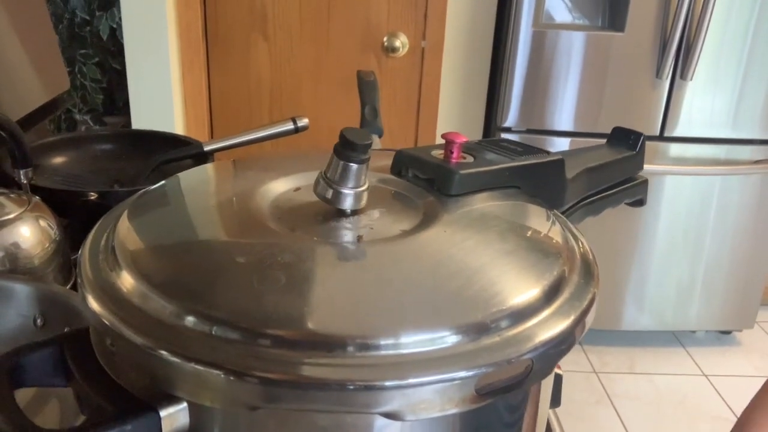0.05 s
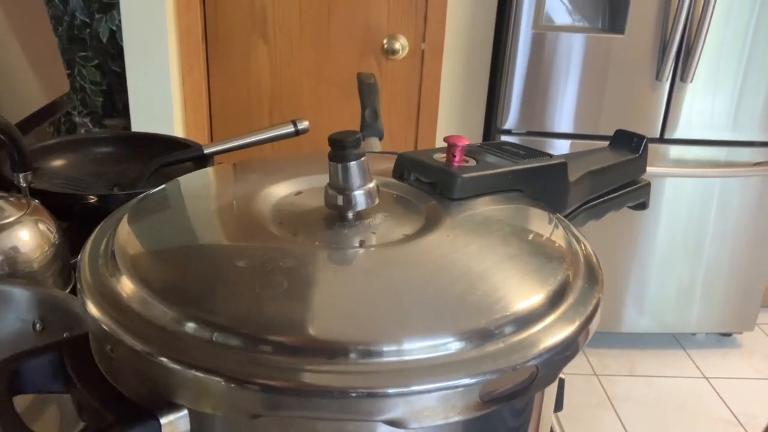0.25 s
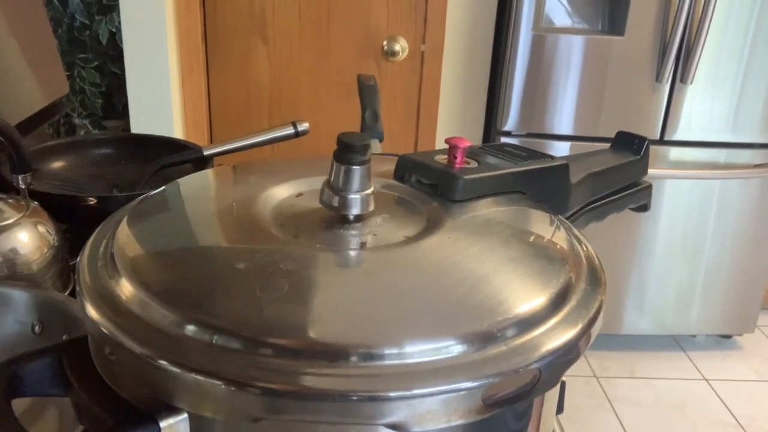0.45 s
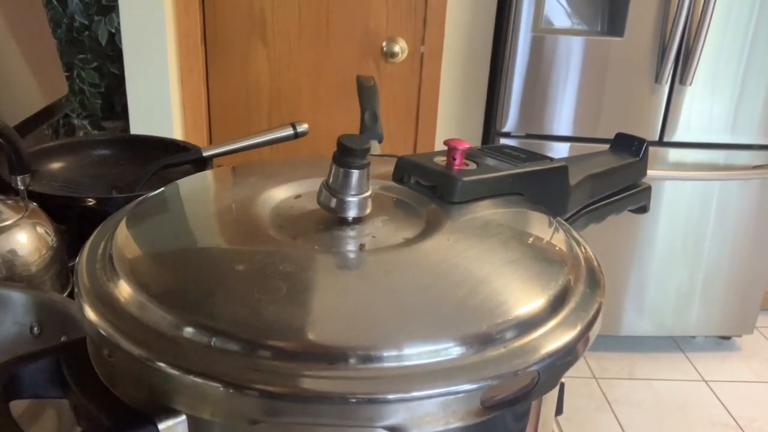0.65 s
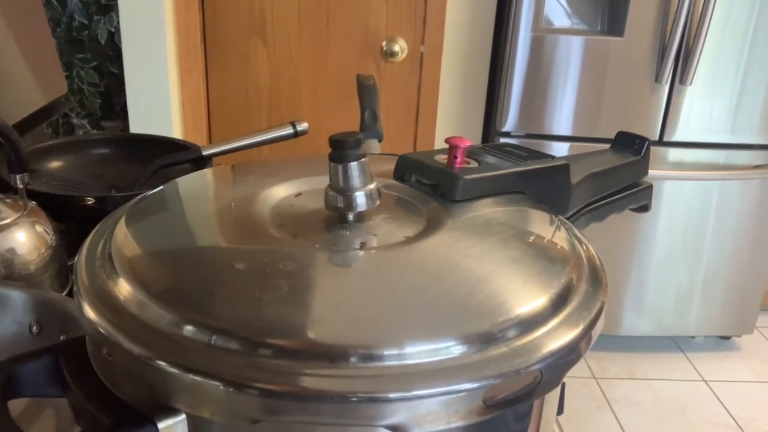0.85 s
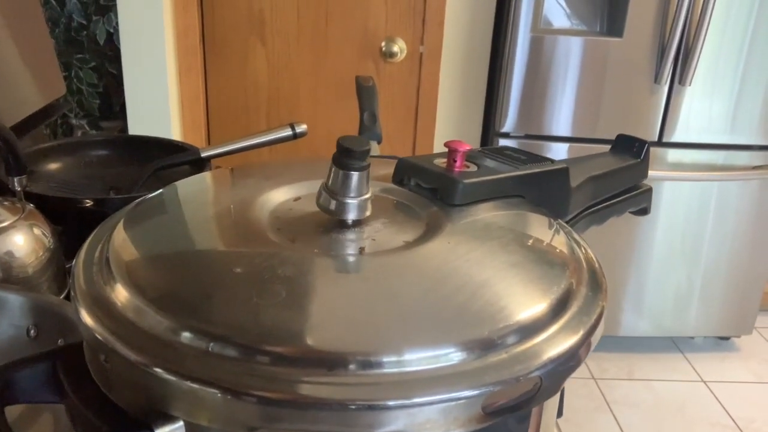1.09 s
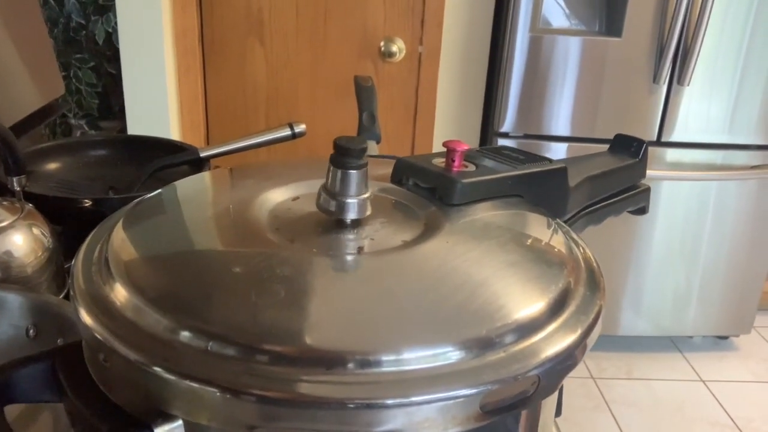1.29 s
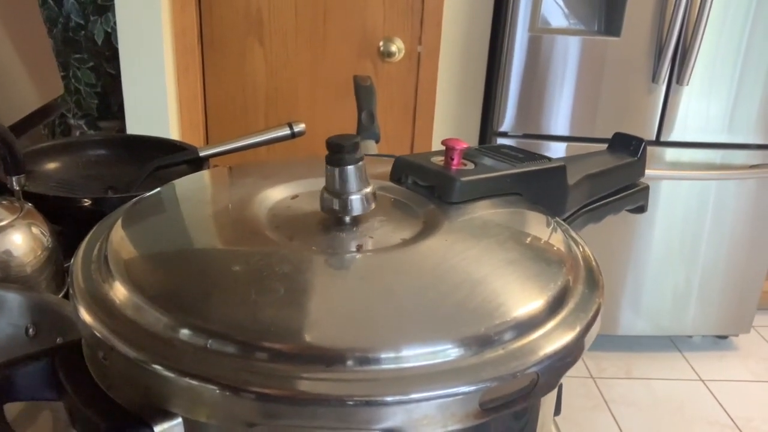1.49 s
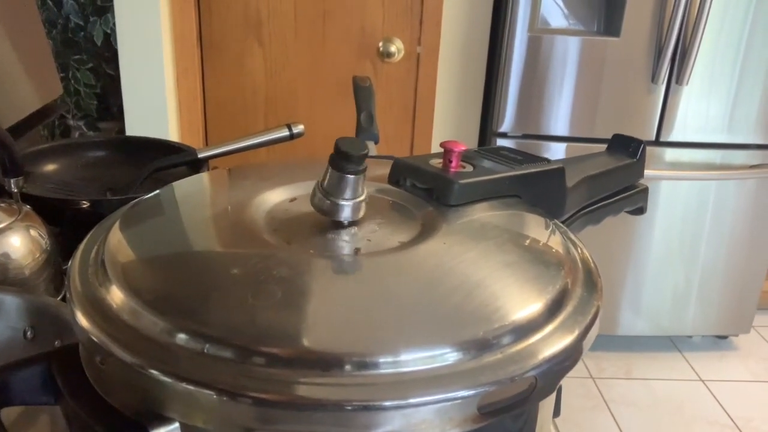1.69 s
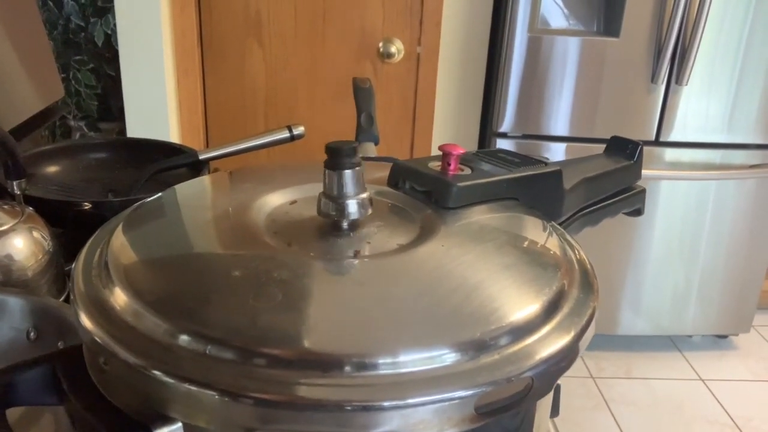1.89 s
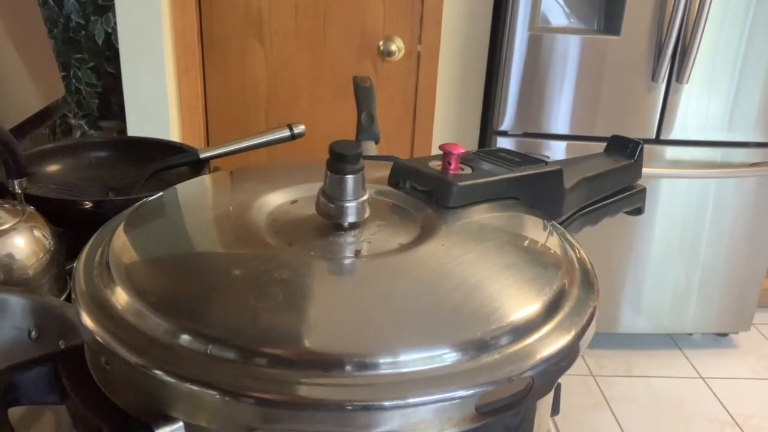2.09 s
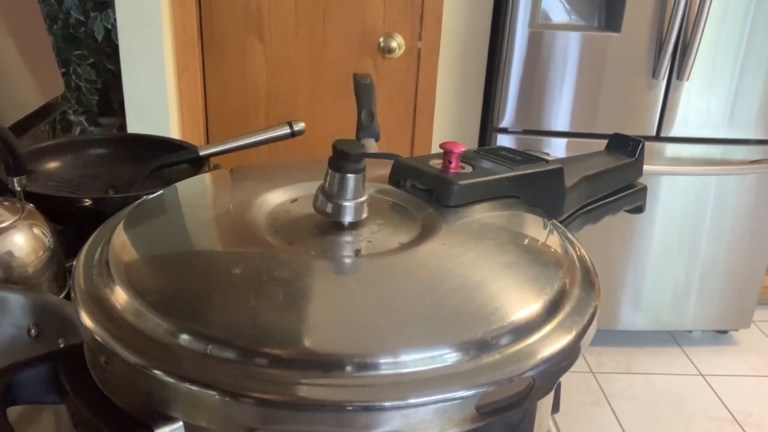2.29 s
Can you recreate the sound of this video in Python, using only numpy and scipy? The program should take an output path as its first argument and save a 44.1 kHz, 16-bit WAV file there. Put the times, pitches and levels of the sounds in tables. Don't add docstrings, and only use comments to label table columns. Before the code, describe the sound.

Pressure cooker steam puffs in quick pulses as its weight clacks, with one early click and thud

```python
import sys
import numpy as np
from scipy import signal
from scipy.fft import rfft, irfft, next_fast_len
from scipy.io import wavfile

SR = 44100
rng = np.random.default_rng(int(sys.argv[2]) if len(sys.argv) > 2 else 0)


def decibels_to_gain(level_db):
    exponent = np.asarray(level_db, float) / 20
    return 10 ** exponent


def inscribe(sig):
    pcm = np.round(np.clip(np.atleast_2d(sig).T, -1, 1) * 32767)
    wavfile.write(sys.argv[1], SR, pcm.astype(np.int16))


N = 103414
SIZE = next_fast_len(N, True)
T, HZ = np.arange(N) / SR, np.fft.rfftfreq(SIZE, 1 / SR) + 1e-3
SIDES = np.array([[1], [-1]])
ROOM_T60_S = 0.13


def curve(table):
    rows = np.array(table)
    return np.interp(np.log(HZ), np.log(rows[:, 0]), rows[:, 1])


def shape(x, gain):
    return irfft(rfft(x, SIZE) * gain, SIZE)[..., :N]


def unit(x):
    return x / np.sqrt(np.mean(x ** 2))


def humps(rows):
    return sum(decibels_to_gain(db) / (1 + 1j * (HZ ** 2 - hz ** 2) / (HZ * width)) for hz, width, db in rows)


def walk(rate_hz):
    return unit(shape(rng.standard_normal(N), 1 / (1 + (HZ / rate_hz) ** 2)))


def fade(start_s, t60_s, rise_s=0.0008):
    t = np.maximum(T - start_s, 0)
    return (1 - np.exp(-t / rise_s)) * np.exp(-np.log(1000) * t / t60_s)


SHAKE = walk(146)


def ring(start_s, modes, chance, rough=0.38, rise_s=0.00062):
    tone = 0
    for (hz, db, t60_s), c in zip(modes, chance):
        phase = 2 * np.pi * hz * (1 + 0.0173 * c) * (T - start_s)
        tone = tone + decibels_to_gain(db + 2 * c) * fade(start_s, t60_s, rise_s) * np.sin(phase)
    return (1 + rough * SHAKE) * tone


def steam(t60_s):
    swing_s, first_swing_s = 0.3275, -0.2832
    leak_db, spit_db, flicker_db, steam_db = -16.5, 2.0, 1.5, -27
    # after_clack_s, rise_s, fall_s, level_db
    puffs = [
        (0.056, 0.024, 0.03, -4),
        (0.19, 0.023, 0.036, 0.5),
        (0.0017, 0.007, 0.024, -8.5),
        (-0.022, 0.02, 0.02, -14),
    ]
    # weak_db, strong_db, burst_db, leak_db, rise_stretch (ratio)
    swings = [
        (0, -8.5, 0, -9, 1.01),
        (1, -2.5, 0.5, -15, 1.4),
        (-0.5, 0, -4.5, -6, 1.44),
        (-1.5, 0.5, 1.5, 2.5, 0.86),
        (-2, 1, 0.9, 0.6, 1.06),
        (-0.2, 0, 0.5, 4.5, 1),
        (0, -1, -1.5, -5.5, 1.04),
        (0, -0.5, -3, -16, 1.06),
        (-5.5, 0, 0.7, -12, 1.01),
    ]
    # frequency_hz, density_db (dB per Hz)
    jet_colour = [(300, -23), (1500, -12.5), (3200, -8), (4600, 0.5), (5600, -7.5), (8400, -7),
                  (12500, -9.5), (15500, -4.5)]
    # frequency_hz, width_hz, level_db
    whistles = [(2080, 90, -13), (4500, 50, -10), (4650, 50, -9), (4890, 50, -10), (5480, 50, -10),
                (5760, 50, -11), (6200, 50, -13), (6545, 50, -13)]

    flow = decibels_to_gain(leak_db) ** 2 + 0 * T
    for k, swing in enumerate(swings):
        for (after_s, rise_s, fall_s, db), extra_db in zip(puffs, swing[:4]):
            t = T - first_swing_s - k * swing_s - after_s
            span = np.where(t < 0, rise_s * swing[4], fall_s)
            flow = flow + decibels_to_gain(db + extra_db) ** 2 * np.exp(-np.abs(t / span) ** 2.05)
    flow = np.abs(shape(flow, 1 / (1 + 1j * np.pi * HZ * t60_s / np.log(1000))))

    spit = decibels_to_gain(spit_db * walk(120))
    jet = 0
    for octave in np.arange(8, 14.5, 0.5):
        band = np.exp(-(np.log2(HZ) - octave) ** 2 * 4)
        jet = jet + decibels_to_gain(flicker_db * walk(28)) * shape(rng.standard_normal(N), band)
    response = decibels_to_gain(curve(jet_colour)) + 0.9 * abs(humps(whistles))
    return decibels_to_gain(steam_db) * np.sqrt(flow) * unit(shape(jet * spit, response))


def clacks():
    # start_s, level_db, lid_ring_db, ping_db, ping_delay_s
    blows = [
        (0.0474, -27.5, -19.5, 0.5, .0006),
        (0.3791, -26, -35, -8, .001),
        (0.6943, -28, -2, -26, .001),
        (1.0258, -22, -12.5, -5, .0024),
        (1.3505, -28, -7, -17.5, .001),
        (1.6857, -23, -26, -5, .0008),
        (2.0113, -25, -31, -3, .0006),
        (2.3354, -29, -33, 1, .001),
    ]
    # frequency_hz, level_db, t60_s
    pipe = [(1166, -5, 0.015), (1696, 1, 0.013), (1985, 0.5, 0.014), (1527, -5, 0.021), (8400, -12, .02)]
    # frequency_hz, level_db, t60_s
    ping = [(11350, 3, .035), (10900, -6, .012), (11800, -8, .03)]
    # frequency_hz, level_db, t60_s
    lid_ring = [(1540, -2, 0.11), (1610, -10, .05), (1470, -13.5, 0.044)]
    # frequency_hz, density_db (dB per Hz)
    crack_colour = [(300, -16), (800, -3), (1600, -7), (2400, -4.5), (4000, -2.5), (10000, -23)]
    crack_db, crack_t60_s = -7.5, 0.038

    out = 0
    crack = unit(shape(rng.standard_normal(N), decibels_to_gain(curve(crack_colour))))
    for (s, db, lid_db, ping_db, delay_s), c in zip(blows, rng.standard_normal((len(blows), 12))):
        hit = decibels_to_gain(-2.5) * ring(s, pipe, c / 2)
        hit = hit + decibels_to_gain(crack_db) * crack * fade(s, crack_t60_s)
        hit = hit + decibels_to_gain(lid_db) * ring(s, lid_ring, 0.23 * c[6:])
        hit = hit + decibels_to_gain(ping_db) * ring(s + delay_s, ping, c[8:] / 4, 0.3)
        out = out + decibels_to_gain(db + 2) * hit
    return out


def knocks():
    # start_s, level_db, upper_mode_db
    tips = [(0.159, -52, 8.5), (0.305, -52.5, -6), (0.491, -49, 9.5), (0.628, -41.5, 1), (0.822, -52, 9.5),
            (0.96, -42, -1), (1.142, -39.5, 1.5), (1.28, -46, 7), (1.475, -53.5, 4.5), (1.616, -42.5, 5),
            (1.789, -43, -2), (1.948, -43, 6), (2.124, -55, 9.5), (2.276, -45.5, 0)]
    # frequency_hz, level_db, t60_s
    lid_low = [(443.5, 1.5, 0.084)]
    # frequency_hz, level_db, t60_s
    lid_high = [(700, 0.6, 0.062), (810, -19, 0.027)]

    out = 0
    for (s, db, high_db), c in zip(tips, rng.standard_normal((len(tips), 3))):
        knock = ring(s, lid_low, c / 2) + decibels_to_gain(high_db) * ring(s, lid_high, c[1:] / 2)
        out = out + decibels_to_gain(db - 0.5) * knock
    return out


def latch():
    start_s, t60_s = 0.44, 0.042
    latch_db, tick_db, rattle_db = -8, 9.8, -6.5
    # frequency_hz, density_db (dB per Hz)
    rattle_colour = [(200, -16), (1000, -20), (3000, -17), (5000, -16), (8000, -1), (10000, -1), (13000, 0),
                     (15500, -8)]
    # frequency_hz, level_db, t60_s
    tongue = [(13400, 2.5, .0016), (12000, -1, .0016), (8300, -8, .002), (700, -40, .012)]

    noise = unit(shape(rng.standard_normal(N), decibels_to_gain(curve(rattle_colour))))
    rattle = decibels_to_gain(rattle_db) * fade(start_s + 0.0005, t60_s / 3)
    rattle = rattle + decibels_to_gain(-15.5) * fade(start_s, t60_s * 2)
    tick = decibels_to_gain(tick_db) * ring(start_s, tongue, np.zeros(4), 0, 0.0001)
    return decibels_to_gain(latch_db) * (tick + noise * rattle)


def door():
    start_s, door_db = 0.531, -29.5
    # frequency_hz, level_db, delay_s, t60_s
    thud_bands = [(61, -9.5, 0.029, 0.52), (105, -9, 0.081, 0.46), (262.4, -6.5, 0.057, 0.51),
                  (362, -3, 0.032, 0.25), (512, -4.5, 0.015, 0.22), (716, -4.5, 0.0066, 0.24),
                  (934, -11.5, 0.023, 0.33), (1530, -3.5, 0.0023, 0.21), (2300, -5.5, 0.001, 0.13)]
    # frequency_hz, level_db, t60_s
    panel = [(1503, 1.5, .075), (790, -10, 0.088), (640, -11, .08), (370, -11, .1)]

    out = decibels_to_gain(6.5) * ring(start_s, panel, np.zeros(4), 0.25, 0.004)
    for hz, db, delay_s, t60_s in thud_bands:
        band = humps([(hz, hz / 3, 0)]) ** 2
        mid, side = [unit(shape(noise, band)) for noise in rng.standard_normal((2, N))]
        spread = min(0.15 + hz / 900, 0.8)
        out = out + decibels_to_gain(db) * fade(start_s, t60_s, delay_s) * (mid + spread * side * SIDES)
    return decibels_to_gain(door_db) * out * decibels_to_gain(2.0 * SIDES)


def kitchen():
    kitchen_db = -57.5
    # frequency_hz, density_db (dB per Hz)
    hush_colour = [(15, -42), (25, -9), (222, -28.5), (405, 9), (547, -10), (681, 6), (1320, -2),
                   (2050, -10), (3000, -5), (3900, -16.5), (6600, -120)]
    # time_s, level_db
    swell = [(0.0, -52), (0.07, -78), (0.13, -55), (0.53, -60.5), (0.55, -41), (0.8, -59), (0.92, -54),
             (1.05, -59), (1.22, -61.5), (1.41, -57), (1.57, -68), (2.34, -69.5)]
    # frequency_hz, width_hz, level_db
    house_modes = [(47.6, 24, -1), (62.2, 6, 5), (104.8, 11.2, 3.5)]

    mid, side, low, wide = rng.standard_normal((4, N))
    colour = decibels_to_gain(curve(hush_colour))
    centre = shape(mid, colour)
    hush = centre + SIDES * shape(side, colour * np.minimum(HZ / 400, 0.95))
    hush = decibels_to_gain(kitchen_db) / np.std(centre) * hush

    rows = np.array(swell)
    boom = humps(house_modes) / (1 + (44 / HZ) ** 8)
    rumble = unit(shape(low, boom)) + 0.35 * SIDES * unit(shape(wide, boom))
    rumble = decibels_to_gain(np.interp(T, rows[:, 0], rows[:, 1])) * rumble
    return (hush + rumble) * decibels_to_gain(1.8 * SIDES)


def ports(x, lead):
    # frequency_hz, level_db
    lean = [(100, 4), (1000, 3.5), (2500, 1), (4000, 2.5), (5000, .3), (9000, 0.0)]
    half = decibels_to_gain(curve(lean) / 2) * np.exp(0.5j * lead)
    return np.array([shape(x, half), shape(x, 1 / half)])


def scene():
    # frequency_hz, phase_rad
    vent_lead = [(1500, 1.1), (2650, 2.9), (4700, 3.5), (6900, 4.8), (8400, 3.25), (11600, .4),
                 (13600, -.4), (16000, -3.1)]
    # frequency_hz, level_db
    room_colour = [(300, -6), (1500, -4), (3000, -2), (4500, -3), (6500, -2), (8300, -11), (12500, -11),
                   (15000, -5)]

    jet, hits, tick = steam(0), clacks() + knocks(), latch()
    room = decibels_to_gain(curve(room_colour))
    tail = rng.standard_normal((2, N)) * fade(0.0012, ROOM_T60_S, 0.0013)
    tail = tail / np.sqrt(np.sum(tail ** 2, axis=1, keepdims=True))
    wet = shape(decibels_to_gain(-1.5) * jet + hits + decibels_to_gain(-11) * tick, rfft(tail, SIZE) * room)
    lingering = np.array([steam(ROOM_T60_S), steam(ROOM_T60_S)])
    wet = wet + decibels_to_gain(-6) * shape(lingering, room)

    near = ports(jet + hits, curve(vent_lead))
    near = near + ports(tick, -2 * np.pi * HZ * 0.000176)
    return near + wet + door() + kitchen()


def top_cut(x):
    return signal.sosfilt(signal.butter(12, 16470, fs=SR, output="sos"), x)


def record(dry):
    mix = shape(dry, 1 / (1 + (31 / HZ) ** 4))
    return top_cut(mix)


dry = scene()
out = record(dry)
inscribe(out)
```